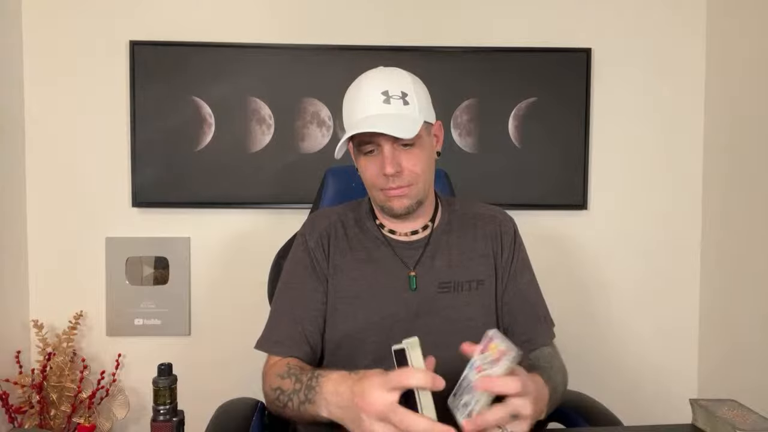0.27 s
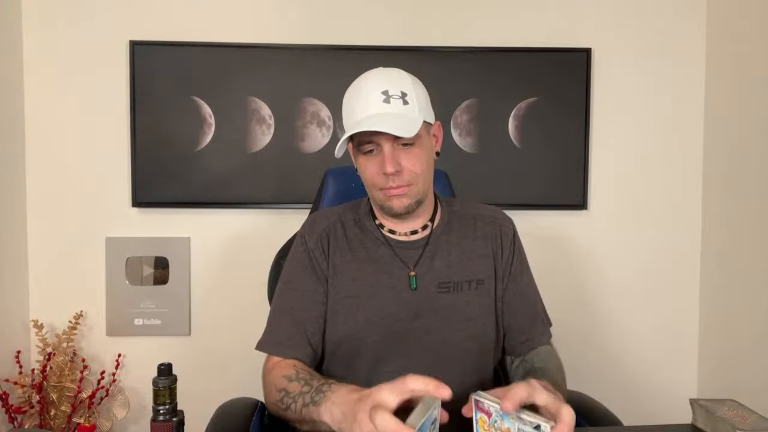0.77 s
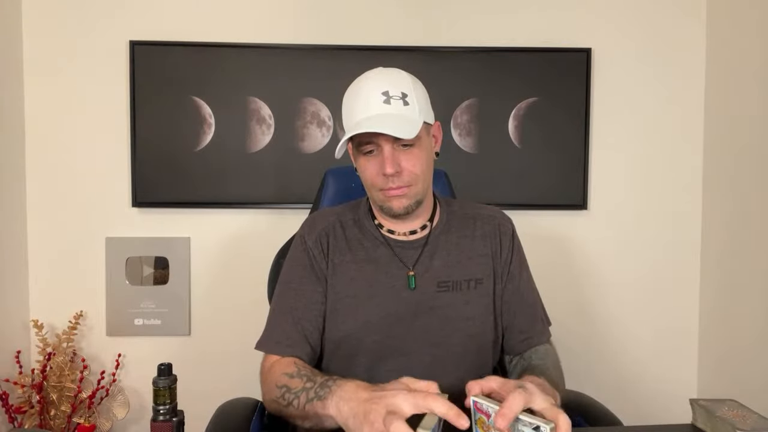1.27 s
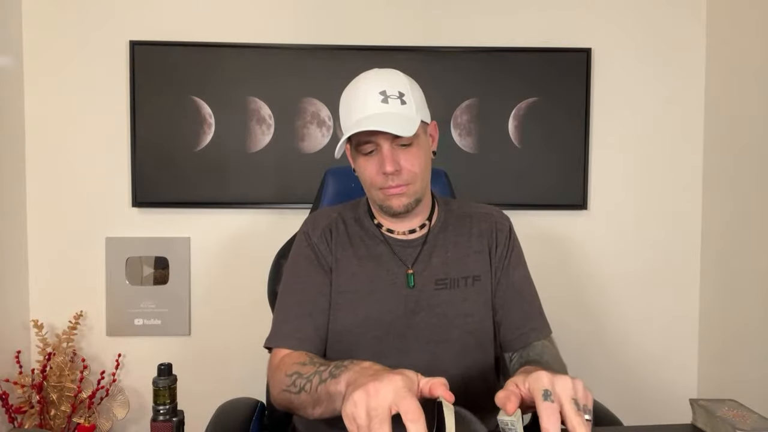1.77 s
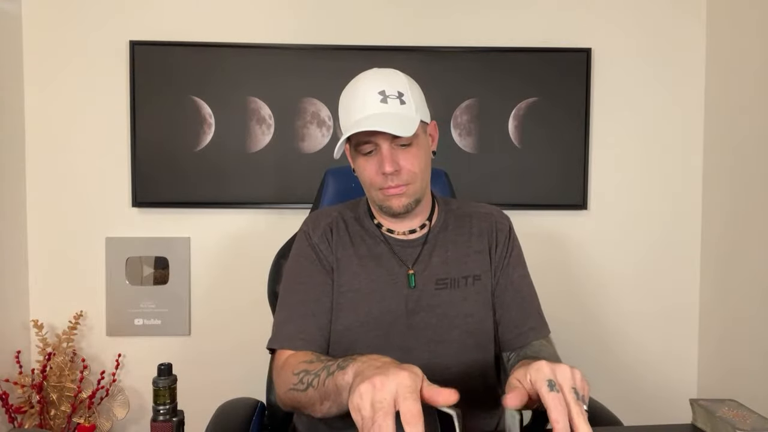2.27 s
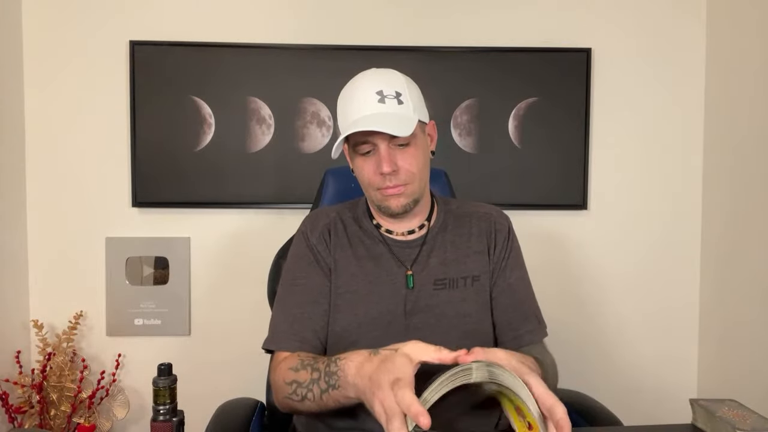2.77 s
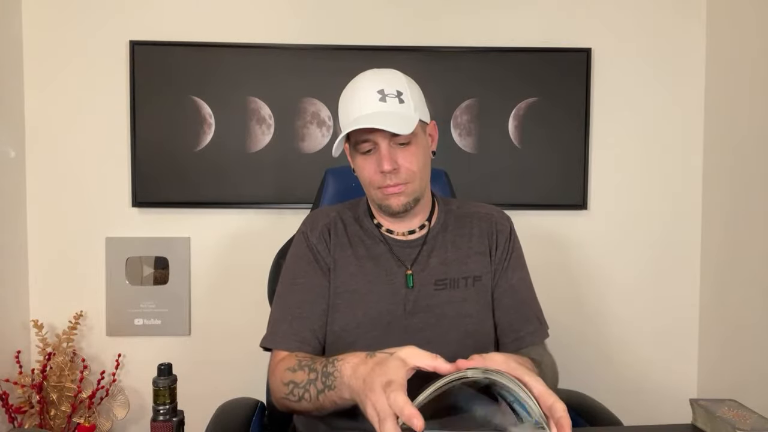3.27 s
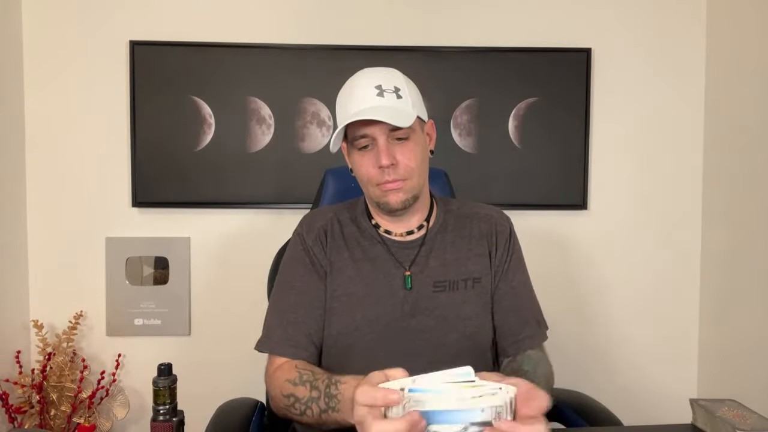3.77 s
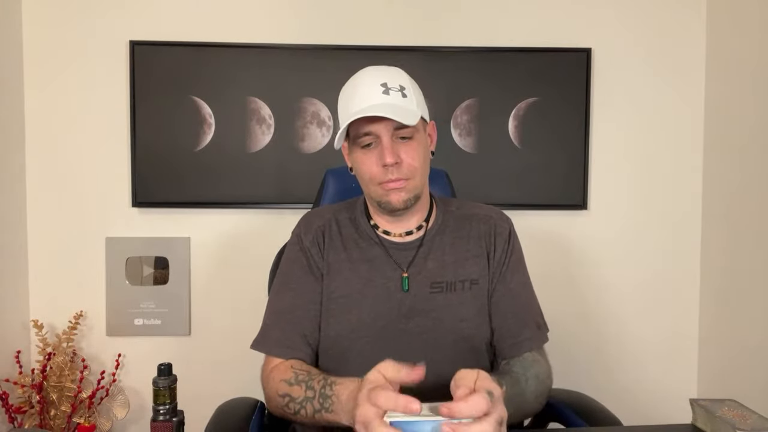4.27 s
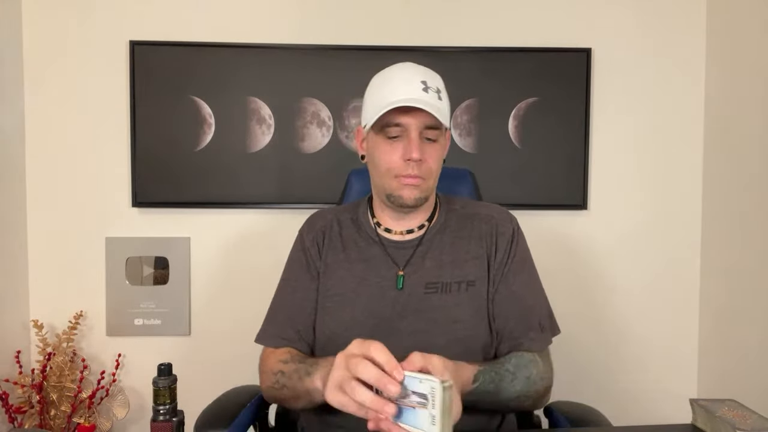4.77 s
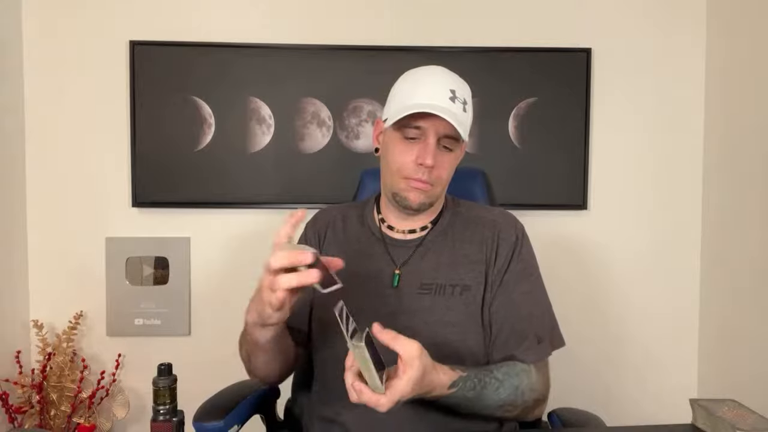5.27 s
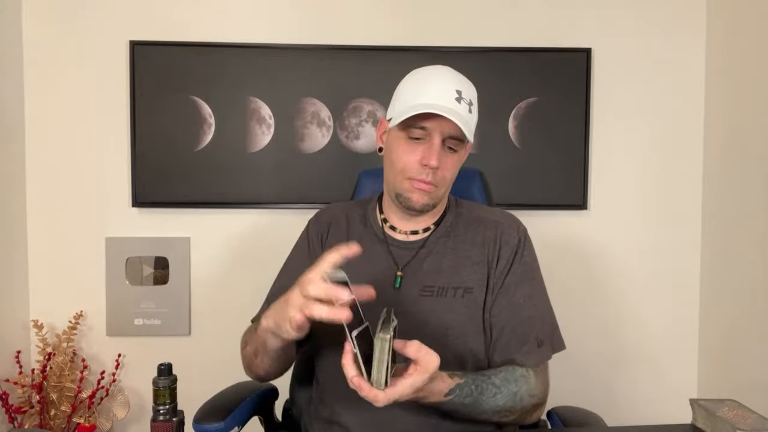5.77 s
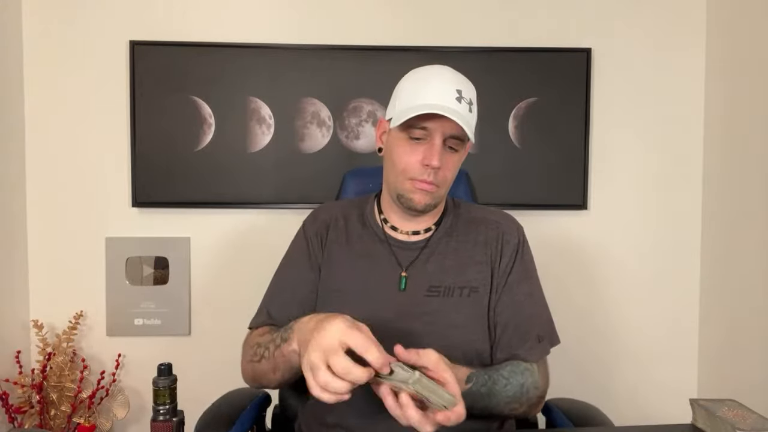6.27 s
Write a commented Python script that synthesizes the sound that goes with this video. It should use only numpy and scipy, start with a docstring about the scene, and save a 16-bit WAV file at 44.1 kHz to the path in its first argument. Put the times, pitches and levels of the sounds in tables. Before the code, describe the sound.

In a small, bare-walled room, half decks of cards clack firmly on a desk, pause, and clack again. A bright riffle follows, with loud uneven snaps over fast papery ticking, then a softer fluttering cascade. Several woody taps square the deck, and a faint papery slide and finger brushes end it. Close microphone, short live echo, low hum and airy room tone.

```python
"""Card shuffle at a desk

A deck is shuffled in a small, live room: bursts of contact noise, coloured by spectra, are the blows and snaps.
Half decks are knocked on the desk, riffled, arched so that they cascade flat, and tapped square.
Then cards slide and flick softly between the fingers, as random grains under a pressure curve.
Decaying noise gives the room's echoes; sines give a faint mains hum over the rush of the air."""
import sys
import numpy as np
from scipy import signal
from scipy.fft import rfft, irfft
from scipy.io import wavfile
from scipy.ndimage import uniform_filter1d

SR = 44100
rng = np.random.default_rng(int(sys.argv[2]) if len(sys.argv) > 2 else 0)


def persist_wave(psi):
    """Save psi, clipped to +-1, as 16-bit WAV."""
    counts = np.round(np.clip(psi, -1, 1) * 32767).astype(np.int16)
    wavfile.write(sys.argv[1], SR, np.atleast_2d(counts).T)


N = 286650
T = np.arange(N) / SR  # time [s]

# All levels below are relative, ahead of each source's own gain, unless marked rms.
# Loudest card corners snapping off the thumbs and each other: (time [s], level [dB], tick pitch [Hz])
CORNER_SNAPS = [(1.5807, -10.5, 3200), (1.6107, -7.5, 4000), (1.6763, -11.5, 10000), (1.7094, -10.5, 5170),
                (1.735, -11.5, 2572), (1.8023, -7, 6440), (1.8418, -6.5, 9000), (1.8926, -9, 3330),
                (1.943, -8.5, 3200), (2.001, -2.5, 7700), (2.1196, -7, 3630), (2.149, -10, 2350),
                (2.201, -2, 8600), (2.2292, -10.5, 2600), (2.26, -5, 8300), (2.3275, -8, 4000),
                (2.3454, -4.5, 7950), (2.458, -13, 4500), (2.6693, -16.5, 5500), (2.7323, -18.5, 4500),
                (2.7913, -16.5, 9500), (2.812, -15, 5500), (2.8865, -21, 4600), (2.9916, -17.5, 5140),
                (3.1456, -19, 6200), (3.2082, -14.5, 5000), (3.285, -13, 5500), (3.3573, -12, 8100),
                (3.512, -8, 5040), (3.6009, -16.5, 6500), (3.7057, -13, 4500), (3.71, -7.5, 4660),
                (5.4952, -30, 3710), (6.4422, -27.5, 3300)]
# Stream of riffled cards: (time [s], level [dB], level of the pile's low body [dB])
RIFFLE_STREAM = [(1.58, -60, -25), (1.636, -45.5, -57), (1.754, -34.5, -42), (1.784, -35.5, -40.5),
                 (2.234, -28, -39), (2.314, -26.5, -39.5), (2.432, -37, -40), (2.52, -42, -54)]
# Spectrum of the riffled edges: (frequency [Hz], level [dB])
RIFFLE_SPECTRUM = [(600, -33.5), (1300, -0.5), (1700, -7), (2500, 6.5), (3500, 1.5), (5000, -0.5),
                   (7000, 2), (7800, -2), (9000, 1), (11000, -3), (13000, -8.5), (16000, -22.5)]
# Spectrum of cards flapping on the pile: (frequency [Hz], level [dB])
FLAP_SPECTRUM = [(25, -53.5), (60, -19.5), (140, 0.5), (300, 5), (550, -1), (950, 1.5), (1500, -2),
                 (3000, -7), (9000, -25)]
# Spectrum of deck edges tapped or scraped into line: (frequency [Hz], level [dB])
EDGE_SPECTRUM = [(40, -40), (300, -9), (900, -5), (1500, 4), (3000, 0), (4200, 3.5), (6200, -2),
                 (8000, -15.5), (10000, -23.5), (16000, -36.5)]
# Modes of the desk top: (frequency [Hz], level [dB], T60 [s])
DESK_MODES = [(130.9, 1.5, 0.46), (328, -1.5, .2), (398.6, 4, 0.5), (565, -8.5, 0.053), (833, -8, .14),
              (1150, -4.5, 0.14), (1420, -7.5, 0.075)]


def undb(db):
    """Decibels become an amplitude ratio by the factor-of-20 law."""
    return 10 ** (np.asarray(db) / 20)


def unit(x):
    """Normalisation by the root mean square gives unit power."""
    return x / np.sqrt(np.mean(x ** 2))


def at(points, hz):
    """Interpolation on a logarithmic frequency axis reads a (frequency [Hz], value) table."""
    f, value = np.transpose(points)
    return np.interp(np.log(hz + 1), np.log(f), value)


def colour(x, points, size=4096):
    """Minimum-phase filtering: folding the cepstrum makes a causal response, here of unit energy."""
    magnitude = undb(at(points, np.fft.rfftfreq(size, 1 / SR)))
    cepstrum = irfft(np.log(magnitude))
    cepstrum[1:size // 2] *= 2
    cepstrum[size // 2 + 1:] = 0
    response = irfft(np.exp(rfft(cepstrum)))
    response /= np.linalg.norm(response)
    return signal.fftconvolve(x, response)[:len(x)]


def add(out, s, x):
    """Superposition: x is summed into out from time s [s]."""
    i = max(int(s * SR), 0)
    out[i:i + len(x)] += x[:max(N - i, 0)]


def burst(decay_s, rise_s=.0001, hz=1000, ring=0, width=0.052, size=4096):
    """Many tiny contacts swell and die away as shaped noise, with a resonance at the card's own pitch."""
    envelope = np.exp(-T[:size] / decay_s) * (1 - np.exp(-T[:size] / rise_s))
    # keep only the phase of the shaped noise, so that its spectrum is flat
    spectrum = np.exp(1j * np.angle(rfft(rng.standard_normal(size) * envelope)))
    x = irfft(spectrum) * np.sqrt(envelope)
    f = np.fft.rfftfreq(size, 1 / SR) + 1
    resonance = 1 + ring / (1 + 1j * (f / hz - hz / f) / width)
    x = irfft(rfft(x) * resonance)
    # the energy of an exponential decay that starts at 1
    return x * np.sqrt(decay_s * SR / 2) / np.linalg.norm(x)


def stroke(s, db, fade_s=0.0074):
    """Amplitude modulation follows a level curve, with a short linear fade beyond each end."""
    gate = np.clip(np.minimum(T - s[0], s[-1] - T) / fade_s + 1, 0, 1)
    return gate * undb(np.interp(T, s, db))


def grains(per_s, spread_db):
    """Shot noise: random clicks of uneven size and either sign, at unit power."""
    size = undb(spread_db * np.minimum(rng.exponential(size=N), 3))
    occurs = rng.random(N) < per_s / SR
    return unit(occurs * size * rng.choice([-1, 1], N))


def flutter(curve, tone, per_s, scatter_db, decay_s, edge_db, rub_db, body_db, ring=2.9, edge_hz=5500, pile_hz=800):
    """Serial impacts: cards fall at uneven gaps, each with its own pitch, their faces rubbing in between."""
    s, db, pile_db = np.transpose(curve)
    ticks, flaps = np.zeros((2, N))
    for k, (slip, size, octave) in enumerate(rng.uniform(-1, 1, (240, 3))):
        start = s[0] + (k + slip) / per_s
        gain = undb(scatter_db * size)
        edge = burst(decay_s, hz=edge_hz * 2 ** octave, ring=ring, size=1024)
        flap = burst(3 * decay_s, hz=pile_hz * 2 ** octave, ring=ring, size=1024)
        add(ticks, start, gain * edge)
        add(flaps, start, gain * flap)
    during = (T > s[0]) & (T < s[-1])
    rubbing = undb(rub_db) * grains(2500, 1.7)
    edges = undb(edge_db) * ticks / ticks[during].std() + rubbing
    body = undb(body_db) * flaps / flaps[during].std()
    return colour(edges * stroke(s, db), tone) + colour(body * stroke(s, pile_db), FLAP_SPECTRUM)


def riffle():
    """Serial impacts of two halves interleaving: card edges tick over the low body of the pile."""
    return flutter(RIFFLE_STREAM, RIFFLE_SPECTRUM, per_s=110, scatter_db=7.5, decay_s=0.0015,
                   edge_db=-5.5, rub_db=-9.5, body_db=-0.5)


def bridge():
    """Serial impacts of the arched deck cascading flat."""
    # Stream of falling cards: (time [s], level [dB], level of the pile's low body [dB])
    cascade = [(2.56, -55.5, -56), (2.736, -39, -39), (2.89, -45.5, -57), (3.06, -42, -50),
               (3.204, -39.5, -43.5), (3.338, -42.5, -49.5), (3.658, -47.5, -49), (3.76, -42, -51)]
    # Spectrum of their edges: (frequency [Hz], level [dB])
    cascade_spectrum = [(600, -23), (1300, -4.5), (2000, 0), (3300, -2), (4900, 2.5), (6500, -2),
                        (9000, -2), (13000, -9), (16000, -11)]
    return flutter(cascade, cascade_spectrum, per_s=100, scatter_db=9, decay_s=0.0011,
                   edge_db=-2.5, rub_db=-2.5, body_db=0)


def snaps(tick_db=-4.5, flap_db=-22, flap_s=0.0041, ring=1.2):
    """Elastic release: a bent card springs free with a pitched tick, then a duller flap as it slaps the pile."""
    # Spectrum of the ticks: (frequency [Hz], level [dB])
    tick_spectrum = [(200, -22.5), (1200, 1.5), (2600, 0.5), (5000, 1), (7000, 1.5), (9500, 1), (12000, -1),
                     (16000, -3)]
    flap_growth = 0.7  # dB of flap for each dB of tick: a harder snap is mostly brighter
    tick, flap = np.zeros((2, N))
    for s, db, hz in CORNER_SNAPS:
        add(tick, s + .0005, undb(db) * burst(.0011, .00004, hz, ring, width=.4))
        add(flap, s + 0.00046, undb(flap_growth * db) * burst(flap_s))
    return undb(tick_db) * colour(tick, tick_spectrum) + undb(flap_db) * colour(flap, FLAP_SPECTRUM)


def rushes(rush_db=-21, decay_s=0.028, rise_s=0.0036):
    """Triggered release: in the riffle each loud snap lets a few more cards rush off the thumb."""
    out = np.zeros(N)
    for s, db, *_ in CORNER_SNAPS:
        if RIFFLE_STREAM[0][0] < s < RIFFLE_STREAM[-1][0] - .1:
            add(out, s + 0.0045, undb(db + rush_db) * burst(decay_s, rise_s))
    return colour(out, RIFFLE_SPECTRUM)


def blows(table, tone, clack_db, thud_db, desk_db, clack_s, thud_s, rise_s, ring, graze_db):
    """Impact and modal ringing: stray cards graze, the edges land in a cluster, the weight thumps the desk."""
    # Spectrum of the desk thud: (frequency [Hz], level [dB])
    thud_spectrum = [(25, -48), (60, -32), (130, 6.5), (200, -1.5), (300, 5.5), (550, 0.5), (850, -2.5),
                     (1400, -3), (2500, -16), (8000, -48.5)]
    clack, thud, push = np.zeros((3, N))
    for s, db, weight_db, hz in table:
        add(clack, s - .0035, undb(db + graze_db) * burst(clack_s, rise_s))
        add(clack, s, undb(db) * burst(clack_s, rise_s, hz, ring, width=.22))
        add(thud, s + .001, undb(db + weight_db) * burst(thud_s, 2 * rise_s))
        add(push, s + 0.0015, undb([db + weight_db]))
    t = T[:SR // 2]
    desk = sum(undb(db) * np.sin(2 * np.pi * hz * t) * undb(-60 * t / t60) for hz, db, t60 in DESK_MODES)
    ringing = signal.fftconvolve(push, desk)[:N]
    return undb(clack_db) * colour(clack, tone) + undb(thud_db) * colour(thud, thud_spectrum) + undb(desk_db) * ringing


def knocks():
    """Impact: half decks are knocked firmly on the desk."""
    # Knocks: (time [s], level [dB], desk thud relative to the clack [dB], ring of the card edges [Hz])
    half_decks = [(0.042, -6, -11, 3570), (0.0467, 1.5, -13, 4400), (0.097, -6, -28, 3110),
                  (0.1207, -12, -23.5, 2800), (0.8075, -2, -30, 4450), (0.812, 1.5, -20, 3780),
                  (0.9752, 3, -16, 3343), (0.9841, -9.5, -14.5, 3750), (1.1857, -12, -17.5, 3700),
                  (1.2178, -13, -34, 4360), (1.6105, -11.5, -7.5, 3970)]
    # Spectrum of the clack: (frequency [Hz], level [dB])
    clack_spectrum = [(40, -42.5), (200, -31), (800, -3), (1400, 3), (2400, 0.5), (3200, -0.5), (4200, 0),
                      (6000, -9), (7500, -19.5), (10000, -31.5), (16000, -43.5)]
    return blows(half_decks, clack_spectrum, clack_db=-7.0, thud_db=-2.0, desk_db=-30.0,
                 clack_s=0.0016, thud_s=0.005, rise_s=0.0011, ring=1.1, graze_db=-11.5)


def taps():
    """Impact: lighter, brighter blows even up the shuffled deck, the thud growing less than the clack."""
    # Taps of the whole deck: (time [s], level [dB], ring of the card edges [Hz])
    whole_deck = [(3.8566, -21.5, 3440), (3.913, -4.5, 4080), (3.921, -1, 4300), (3.9501, -9, 2577),
                  (4.1454, -19, 4100), (4.1985, -1.5, 2590), (4.218, -6, 3540), (4.3194, -13, 2650),
                  (4.37, -10.5, 2740), (4.4507, 0, 3650), (4.4549, -4, 2665)]
    # thud of a 0 dB tap [dB], and its growth for each dB of clack
    full_thud_db, thud_growth = -27.5, 0.32
    rows = [(s, db, full_thud_db + thud_growth * db - db, hz) for s, db, hz in whole_deck]
    return blows(rows, EDGE_SPECTRUM, clack_db=-6.5, thud_db=-1.5, desk_db=-27.5,
                 clack_s=0.002, thud_s=0.0011, rise_s=0.0076, ring=0.69, graze_db=-16)


def slaps(slap_db=-4.5, ring=1.9):
    """Air pumping: air squeezed from between flat cards gives a short hollow knock."""
    # Small blocks of cards landing flat: (time [s], level [dB], slap pitch [Hz])
    flat_blocks = [(0.047, -10, 1390), (0.792, -21, 1406), (0.977, -10, 835), (1.186, -18, 1030),
                   (1.608, -16, 940), (2.41, -13.5, 1180), (2.459, -16.5, 935), (2.669, -21.5, 600),
                   (2.735, -28, 1420), (2.906, -30.5, 970), (3.225, -23.5, 1570), (3.466, -30, 1088),
                   (3.709, -26.5, 700), (3.857, -21, 1400), (3.881, -24, 820), (4.42, -22.5, 1490)]
    # Spectrum of the slaps: (frequency [Hz], level [dB])
    slap_spectrum = [(40, -37.5), (200, -5.5), (450, -1.5), (800, 4.5), (2000, -1.5), (3500, -3.5),
                     (6000, -23), (12000, -44)]
    out = np.zeros(N)
    for s, db, hz in flat_blocks:
        add(out, s, undb(db) * burst(.0025, .0006, hz, ring, width=.5))
    return undb(slap_db) * colour(out, slap_spectrum)


def bumps(bump_db=-11, boom_db=-16):
    """Modal excitation: the heel of a hand pushes the desk softly and sets its lowest mode booming."""
    # Soft bumps of the hands: (time [s], level [dB])
    hand_bumps = [(0.064, -20.5), (4.455, -24), (4.78, -27), (4.799, -35.5), (4.827, -39.5), (6.437, -37)]
    # Spectrum of the pushes: (frequency [Hz], level [dB])
    push_spectrum = [(25, -37), (50, -14), (80, -6), (137, 2.5), (220, -10.5), (400, -4.5), (700, -21.5),
                     (2000, -23), (6000, -46)]
    pushes, boom = np.zeros((2, N))
    t = T[:SR // 2]
    boom_hz, _, boom_t60 = DESK_MODES[0]
    mode = np.sin(2 * np.pi * boom_hz * t) * undb(-60 * t / boom_t60)
    for s, db in hand_bumps:
        add(pushes, s, undb(db) * burst(.014, .003))
        add(boom, s, undb(db) * mode)
    return undb(bump_db) * colour(pushes, push_spectrum) + undb(boom_db) * boom


def rubs(table, attack_s, release_s):
    """Sliding friction under pressure: each stroke takes hold quickly, swells or eases, and lets go."""
    pressure = np.zeros(N)
    for s, length_s, db, swell_db in table:
        attack = np.clip((T - s) / attack_s, 0, 1)
        release = np.exp(-np.maximum(T - s - length_s, 0) / release_s)
        progress = np.clip((T - s) / length_s, 0, 1)
        pressure += attack * release * undb(db + swell_db * (progress - .5))
    return pressure


def scrapes(scrape_db=-2, per_s=500, spread_db=4):
    """Friction of edges: protruding cards tick past each other as the deck is pushed square."""
    # Scrapes: (start [s], length [s], level [dB], swell over the push [dB])
    edge_pushes = [(3.85, .035, -33.5, 2.5), (4.06, .125, -52.5, 6.5), (4.192, .026, -28.5, 0),
                   (4.29, .085, -37, 5), (4.42, .025, -31, -8), (4.56, .012, -32.5, -11)]
    pressure = rubs(edge_pushes, attack_s=0.002, release_s=0.0046)
    return undb(scrape_db) * colour(grains(per_s, spread_db) * pressure, EDGE_SPECTRUM)


def slides(slide_db=-4, catch_db=2.0):
    """Stick-slip friction: card faces catch and slip in a dense papery rasp."""
    # Slides: (start [s], length [s], level [dB], swell over the stroke [dB])
    face_strokes = [(0.961, 0.029, -32.5, 2.5), (1.414, 0.037, -36, -6), (3.706, 0.023, -30, -3),
                    (5.02, 0.17, -38, -7), (5.748, 0.061, -49.5, -2), (6.105, 0.015, -51, -4),
                    (6.415, 0.029, -40.5, 17)]
    # Spectrum of the rasp: (frequency [Hz], level [dB])
    rasp_spectrum = [(120, -23.5), (300, -7), (500, -2), (650, -9.5), (850, -1), (1350, -6), (1900, -8.5),
                     (3200, -9.5), (6500, -14), (10000, -23.5), (16000, -35.5)]
    pressure = rubs(face_strokes, attack_s=0.0085, release_s=0.014)
    wander = unit(uniform_filter1d(rng.standard_normal(N), size=300))
    catching = unit(undb(catch_db * wander))
    return undb(slide_db) * colour(grains(1500, 2.3) * catching * pressure, rasp_spectrum)


def fingers(skin_db=-1):
    """Soft friction: skin whispers over the card backs."""
    # Fingertip brushes: (start [s], length [s], level [dB], swell over the stroke [dB])
    skin_strokes = [(0.29, 0.034, -63.5, 3), (0.47, 0.024, -61, 6), (1.31, .09, -67, 4),
                    (1.412, .025, -55, -16), (4.706, 0.02, -54.5, -2), (4.75, 0.16, -65, -9),
                    (5.493, 0.019, -50, -3), (5.58, 0.15, -74.5, 2), (5.746, .035, -57, -2),
                    (6.082, 0.053, -56, 9), (6.275, 0.17, -60, 16)]
    # Spectrum of the whisper: (frequency [Hz], level [dB])
    skin_spectrum = [(500, -19), (2500, 0), (6000, -2), (9000, -5), (12000, -9), (16000, -15)]
    pressure = rubs(skin_strokes, attack_s=.005, release_s=0.01)
    return undb(skin_db) * colour(grains(2200, 3.7) * pressure, skin_spectrum)


def room(x, wet_db, gap_s=0.0049, build_s=0.0012):
    """Reverberation: bare walls answer after a few milliseconds, and the treble dies first."""
    # Decay time of the room: (frequency [Hz], T60 [s])
    decay_times = [(100, 0.43), (700, 0.43), (1800, 0.4263), (4800, 0.33), (9000, 0.32), (16000, 0.27)]
    # Strength of the echoes: (frequency [Hz], level [dB])
    echo_levels = [(100, 4), (400, -1), (1500, 1), (4500, -6.5), (9000, -5), (16000, -4)]
    t = T[:SR]
    hz = np.fft.rfftfreq(SR, 1 / SR)
    noise = rfft(rng.standard_normal(SR))
    onset = np.clip((t - gap_s) / build_s, 0, 1)
    echo = np.zeros(SR)
    for low in 44 * 2 ** (np.arange(18) / 2):  # half-octave bands
        band = (hz >= low) & (hz < low * np.sqrt(2))
        centre = hz[band].mean()
        tail = irfft(noise * band) * onset * undb(-60 * t / at(decay_times, centre))
        tail /= np.linalg.norm(tail)
        # energy in proportion to bandwidth
        echo += tail * np.sqrt(band.mean()) * undb(at(echo_levels, centre))
    return x + signal.fftconvolve(x, undb(wet_db) * echo)[:N]


def background():
    """Steady tones and filtered noise: mains hum and the low rush of the room's air."""
    # Mains hum: (frequency [Hz], level [dB rms])
    hum_partials = [(120, -53), (240, -74.5), (360, -82)]
    # Spectrum of the air: (frequency [Hz], level [dB])
    air_spectrum = [(20, -19), (40, -20), (60, -10.5), (85, -0.5), (120, -7), (170, -8.5), (250, -12),
                    (500, -16), (1000, -23.5), (1900, -34.5), (2600, -37), (7000, -40), (11000, -37.5),
                    (16000, -50.5)]
    air_db = -60.5  # rms
    hum = sum(undb(db) * np.sqrt(2) * np.sin(2 * np.pi * (hz * T + rng.random())) for hz, db in hum_partials)
    return hum + undb(air_db) * unit(colour(rng.standard_normal(N), air_spectrum))


def scene():
    """Source position: each move has its own spot and angle, and so stirs the room's echoes differently."""
    cards = room(knocks() + bumps(), wet_db=0.5)
    cards += room(taps() + scrapes(), wet_db=0.1)
    cards += room(snaps(), wet_db=-3.0)
    cards += room(slaps(), wet_db=-7.0)
    cards += room(riffle() + rushes() + bridge(), wet_db=-4.5)
    cards += room(slides() + fingers(), wet_db=-1.5)
    return (cards + background())[None]


def record(dry):
    """Soft saturation rounds only the very loudest peaks; filters cut the rumble and the top."""
    rounded = dry / (1 + (dry / .85) ** 8) ** (1 / 8)
    low_cut = signal.butter(3, 58, "high", fs=SR, output="sos")
    top_cut = signal.ellip(8, .2, 70, 16000, fs=SR, output="sos")
    return signal.sosfilt(top_cut, signal.sosfilt(low_cut, rounded))


dry = scene()
out = record(dry)
persist_wave(out)
```